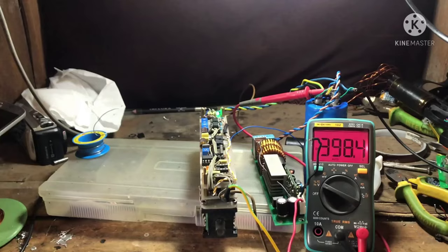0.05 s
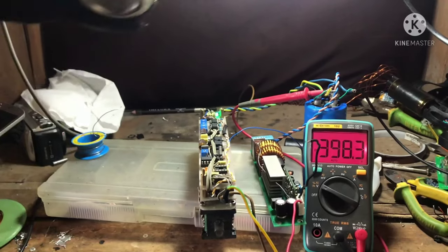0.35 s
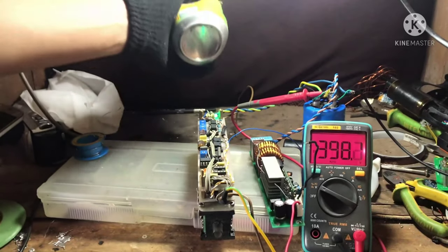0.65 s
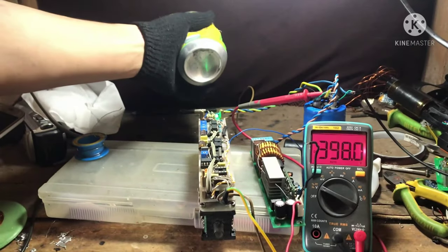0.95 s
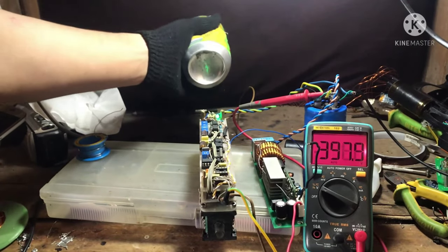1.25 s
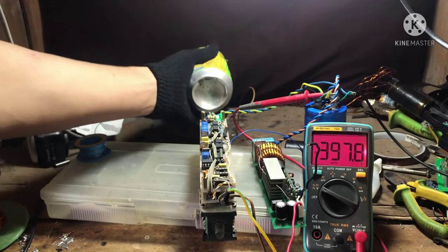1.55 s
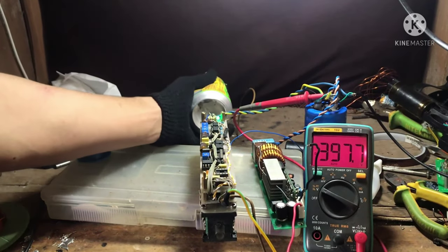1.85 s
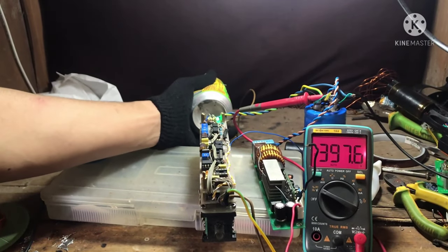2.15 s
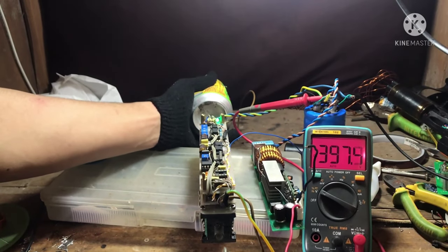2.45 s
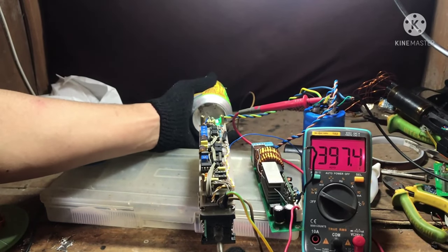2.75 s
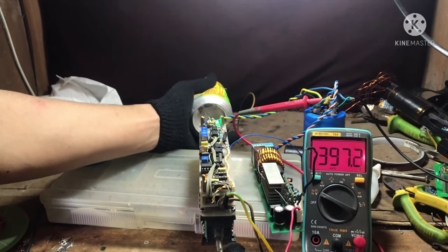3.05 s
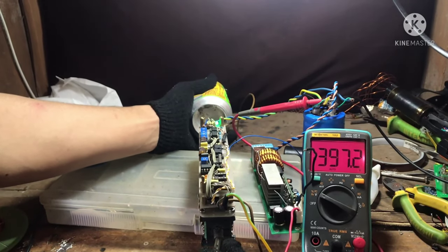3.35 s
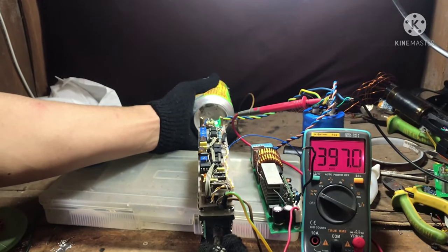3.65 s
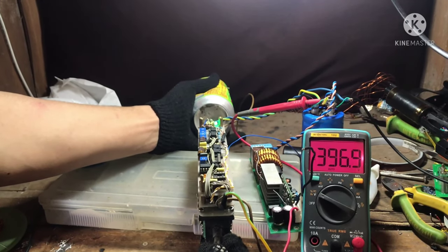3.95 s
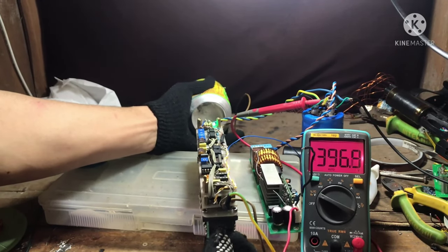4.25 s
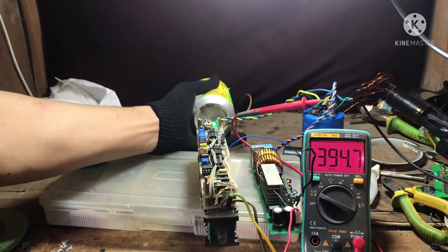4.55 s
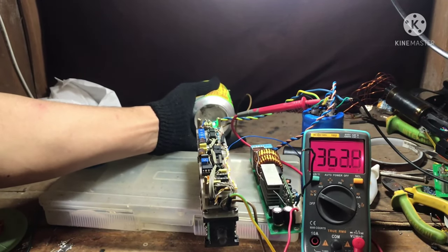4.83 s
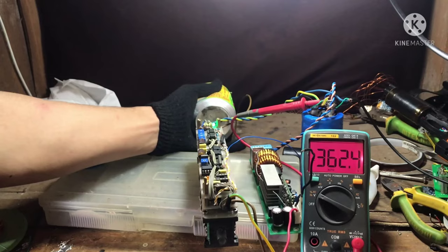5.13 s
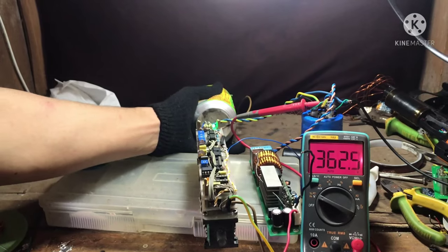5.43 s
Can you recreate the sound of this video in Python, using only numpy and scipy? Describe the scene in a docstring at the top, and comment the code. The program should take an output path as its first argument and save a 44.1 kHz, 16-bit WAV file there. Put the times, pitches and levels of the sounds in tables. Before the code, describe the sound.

A gloved hand softly scrapes and taps a homemade coil gun on a workbench, close to the microphone. For a few seconds there is little but room hum, hiss and a very faint, distant whine. Then comes a sharp snap and, right behind it, the loud metallic crack of the shot, ringing briefly in the small room. Quick knocks and ticks settle, a separate hard click sounds, and the quiet hum returns.

```python
"""A homemade coil gun fires on a cluttered bench in a small, quiet workshop.
Its slug hisses up the barrel and strikes; the impact excites the modes of the metal and the room.
The trigger snaps just before; afterwards the slug knocks about and a last sharp click follows.
Friction and light taps of a gloved hand come before and, fainter, a rustle after.
Underneath lie room hum, microphone hiss and a thin, distant whine."""
import sys
import numpy as np
from scipy import signal
from scipy.fft import rfft, irfft, next_fast_len
from scipy.io import wavfile
from scipy.ndimage import uniform_filter1d

SR = 44100
rng = np.random.default_rng(int(sys.argv[2]) if len(sys.argv) > 2 else 0)


def master(y):
    """Save y as 16-bit WAV."""
    cut = np.clip(np.atleast_2d(y).T, -1, 1)
    pcm = np.round(cut * 32767)  # scale
    wavfile.write(sys.argv[1], SR, pcm.astype(np.int16))


N = 250929
TIME = np.arange(N) / SR


def amp(db):
    """Amplitude ratio of a relative level: 20 dB to a factor of ten."""
    return 10 ** (np.asarray(db) / 20)


def unit_rms(x):
    """Normalisation to unit mean power."""
    return x / np.sqrt(np.mean(x ** 2) + 1e-20)


def curve_at(points, hz):
    """Interpolation on a logarithmic frequency axis."""
    f, value = np.transpose(points)
    return np.interp(np.log(hz + 1), np.log(f + 1), value)


def add(mix, start, sound):
    """Superposition of a sound from a given time on."""
    part = mix[round(start * SR):][:len(sound)]
    part += sound[:len(part)]


def drift(cutoff_hz):
    """Random fluctuation: low-passed noise of unit rms."""
    size = next_fast_len(N, True)
    passband = np.fft.rfftfreq(size, 1 / SR) < cutoff_hz
    return unit_rms(irfft(rfft(rng.standard_normal(size)) * passband, size)[:N])


def envelope(start, attack_s, hold_s, t60_s, jump=0):
    """Exponential decay after a jump, a linear rise to one and a hold."""
    t = TIME - start
    rise = np.minimum(jump + (1 - jump) * t / attack_s, 1)
    decay = amp(-60 * np.maximum(t - attack_s - hold_s, 0) / t60_s)
    return (t >= 0) * rise * decay


def arch(start, length):
    """Half-sine window: a swell from zero to one and back."""
    return np.sin(np.pi * np.clip((TIME - start) / length, 0, 1))


def resonate(x, spectrum, modes=(), size=16384):
    """Minimum-phase filtering at unit energy: resonances standing on a broad spectrum."""
    hz = np.fft.rfftfreq(size, 1 / SR)
    peaks = 1 + sum(amp(db) / (1 + 2j * (hz - f) / width) for f, width, db in modes)
    magnitude = amp(curve_at(spectrum, hz)) * abs(peaks)
    cepstrum = irfft(np.log(magnitude + 1e-9))
    cepstrum[1:size // 2] *= 2  # folding onto positive time makes the response causal
    cepstrum[size // 2 + 1:] = 0
    response = irfft(np.exp(rfft(cepstrum)))
    return signal.oaconvolve(x, response / np.linalg.norm(response))[:N]


def clatter(shape, passes=4):
    """Dense micro-contacts as shaped noise: spectrally flat where loud, Gaussian where faint."""
    core, fringe = shape * rng.standard_normal((2, len(shape)))
    for _ in range(passes):  # flatten the spectrum, then restore the envelope
        core = irfft(np.exp(1j * np.angle(rfft(core))), len(core))
        core *= shape / np.sqrt(abs(uniform_filter1d(core ** 2, size=64)) + 1e-14)
    share = np.minimum(1, 10 * (shape / shape.max()) ** 2)
    return np.sqrt(share) * core + np.sqrt(1 - share) * fringe


def impacts(rows, spectrum, modes, direct):
    """Impact excitation: each contact and its quick scatter off the bench ring the struck body."""
    force, t = np.zeros(N), TIME[:SR // 8]
    for start, db, t60, cutoff_hz in rows:
        contact = clatter(amp(-60 * t / t60))
        contact /= np.linalg.norm(contact)
        contact[0] += direct
        pole = np.exp(-2 * np.pi * cutoff_hz / SR)  # a soft contact lasts longer and loses its treble
        add(force, start, amp(db) * signal.lfilter([1 - pole], [1, -pole], contact))
    return resonate(force, spectrum, modes)


# Spectrum of rumble and hiss: f/Hz, level/dB
FLOOR_SPECTRUM = [(25, -30), (42, 0.5), (75, -1.5), (120, -10.5), (280, -10.5), (420, -17.5), (1000, -22.5),
                  (2000, -31.5), (5000, -36.5), (7700, -34), (8500, -24.5), (9400, -27.5), (10400, -31.5),
                  (15500, -40.5)]
# Narrow lines in it: f/Hz, bandwidth/Hz, level/dB
FLOOR_LINES = [(75, 8, -3.5), (100, 6, -4.5), (166, 10, 7.5), (217, 8.7, 3.5), (264, 7, 3.5),
               (323, 10, 2.5), (619, 18, 3.5), (8370, 25, 10.5), (8790, 40, 11.5), (9030, 25, 9),
               (9410, 25, 13), (9660, 25, 9.5)]


def background(level_db=-56.5, waver_db=.5):
    """Noise floor: room hum and microphone hiss form a continuous spectrum with narrow lines."""
    noise = resonate(rng.standard_normal(N), FLOOR_SPECTRUM, FLOOR_LINES)
    return amp(level_db + waver_db * drift(4)) * unit_rms(noise)


def hum_swell(start_s=2, length_s=1.16, hz=270, level_db=-61.5, waver_db=3.0):
    """Amplitude modulation: one tone of the room's hum swells once, unsteadily."""
    gain = arch(start_s, length_s) * amp(level_db + waver_db * drift(8))
    return gain * np.sin(2 * np.pi * hz * TIME)


# Swells of the whine: t/s, duration/s, f/Hz, level/dB
WHINE_SWELLS = [(2.796, .24, 722, -71), (3.232, 0.11, 716, -70), (3.531, .13, 805, -69),
                (3.797, 0.31, 795, -70.5)]


def whine(sag=.04, jitter=0.0348, partials_db=(1, 0, -12)):
    """Harmonic series of a far, unsteady tone whose pitch and amplitude follow the same arch."""
    gain, pitch = np.zeros(N), np.zeros(N)
    for start, length, hz, db in WHINE_SWELLS:
        swell = arch(start, length)
        gain += amp(db) * swell
        pitch[TIME >= start] = (hz * (1 - sag * (1 - swell)))[TIME >= start]
    phase = 2 * np.pi * np.cumsum(pitch * (1 + jitter * drift(88.8))) / SR
    return gain * sum(amp(db + 2 * drift(23)) * np.sin(k * phase) for k, db in enumerate(partials_db, 1))


# Reverberation time of the workshop: f/Hz, T60/s
REVERB_TIMES = [(100, 0.4), (400, 1.1), (800, 0.91), (3000, 0.87), (6000, 0.9), (12000, 0.62)]
# Spectrum of its echo: f/Hz, level/dB
REVERB_SPECTRUM = [(60, -9), (300, -8.5), (850, -11), (1500, -15.5), (3000, -19), (6000, -18.5),
                   (15000, -20.5)]


def reverberation(x, build_s=0.0069):
    """Diffuse field: it builds up quickly, then each band decays exponentially at its own rate."""
    hz, t, noise = signal.stft(rng.standard_normal(SR), SR, nperseg=256)
    t60 = curve_at(REVERB_TIMES, hz)[:, None]
    decay = amp(-60 * t / t60) * np.sqrt(2 * np.log(1000) / (t60 * SR))  # unit energy in each band
    bands = noise * decay * amp(curve_at(REVERB_SPECTRUM, hz))[:, None]
    tail = signal.istft(bands, SR, nperseg=256)[1][:SR]
    onset = 1 - np.exp(-(TIME[:SR] / build_s) ** 2)
    return signal.oaconvolve(x, tail * onset)[:N]


# Strokes of glove and sleeve: t/s, duration/s, level/dB
CLOTH_STROKES = [(0.095, 0.39, -68.5), (0.224, 0.069, -69.5), (5.42, .26, -79)]
# Their spectrum: f/Hz, level/dB
CLOTH_SPECTRUM = [(500, -5), (2500, -1), (7000, -3), (11000, -2.5), (13500, 2), (15500, -3.5)]
# Scrapes of the gun being moved into place: t/s, slide/s, level/dB, resonance/Hz
GUN_SCRAPES = [(0.496, 0.045, -53, 1030), (.56, 0.043, -54.5, 620), (.815, 0.036, -68.5, 1040),
               (1.24, 0.029, -63, 1200)]
# Their spectrum: f/Hz, level/dB
SCRAPE_SPECTRUM = [(200, -17), (430, -4.5), (550, 1), (800, -2.5), (1100, -4), (1600, -13), (2300, -27.5),
                   (5000, -44)]
# Thin zips of the sliding knit: t/s, duration/s, initial f/Hz, level/dB
KNIT_ZIPS = [(.32, .09, 14200, -72), (.39, .08, 14800, -68), (5.5, .07, 13200, -73),
             (5.58, .08, 12400, -72)]


def handling(grip_db=1.0, scrape_width_hz=220, scrape_peak_db=6.5, slowing_per_s=1.4, zip_band_hz=250):
    """Sliding friction: cloth rustles, the gun scrapes and the knit zips, all catching unevenly."""
    strokes = sum(amp(db) * arch(start, length) for start, length, db in CLOTH_STROKES)
    out = strokes * resonate(rng.standard_normal(N), CLOTH_SPECTRUM)
    for start, slide, db, hz in GUN_SCRAPES:
        mode = (hz, scrape_width_hz, scrape_peak_db)
        friction = resonate(rng.standard_normal(N), SCRAPE_SPECTRUM, [mode])
        out += amp(db) * envelope(start, attack_s=0.0071, hold_s=slide, t60_s=0.43) * friction
    for start, length, hz, db in KNIT_ZIPS:
        pitch = hz * (1 - slowing_per_s * np.clip(TIME - start, 0, length))  # falls as the stroke slows
        narrow_noise = drift(zip_band_hz) * np.sin(2 * np.pi * np.cumsum(pitch) / SR)
        out += amp(db) * arch(start, length) * narrow_noise
    return out * amp(grip_db * drift(69))


# Fingers on the gun, and at 0.4995 s the knock that starts the first scrape: t/s, level/dB, contact cutoff/Hz
FINGER_TAPS = [(.4995, -33, 500), (.749, -27.5, 9000), (1.375, -40.5, 6000), (2.31, -45, 3000),
               (4.044, -32.5, 12000)]
# Their spectrum: f/Hz, level/dB
TAP_SPECTRUM = [(200, -13), (700, -5), (1250, 6), (1800, -11.5), (2500, -7), (3100, -4.5), (4200, -14.5),
                (6000, -25.5), (15000, -28.5)]
# Modes they excite: f/Hz, bandwidth/Hz, level/dB
TAP_RESONANCES = [(2912, 40, 3), (3200, 35, 6)]


def finger_taps(t60_s=.08):
    """Light impacts: shifting fingers, and the knock that opens the first scrape, weakly excite the gun's
    modes."""
    rows = [(start, db, t60_s, hz) for start, db, hz in FINGER_TAPS]
    return impacts(rows, TAP_SPECTRUM, TAP_RESONANCES, direct=.05)


# Recoil and soft bumps: t/s, level/dB, f/Hz, duration/s
BENCH_BUMPS = [(1.9155, -35, 137, 0.014), (4.2815, -24.5, 274, 0.0042), (4.283, -29.5, 75, .014),
               (4.384, -36.5, 127, 0.019), (5.074, -44.5, 149.6, 0.03), (5.606, -43.5, 140, 0.02)]


def bench_bumps():
    """Gaussian wave packets: recoil and padded contacts push the bench briefly at low frequency."""
    out = np.zeros(N)
    for centre, db, hz, length in BENCH_BUMPS:
        t = TIME - centre
        out += amp(db) * np.cos(2 * np.pi * hz * t) * np.exp(-2 * np.pi * (t / length) ** 2)
    return out


# Spectrum of loose bits ticking on the bench: f/Hz, level/dB
TICK_SPECTRUM = [(300, -12), (800, -2), (2200, -6), (3800, 1), (7000, -7), (15000, -3)]


def settling(start_s=4.31, length_s=.25, ticks_per_s=50, level_db=-20, fall_db_per_s=61, spread_db=2.5):
    """Poisson process: loose bits tick at random, ever more weakly, as they settle after the shot."""
    t = TIME - start_s
    ticks = (rng.random(N) < ticks_per_s / SR) * (t > 0) * (t < length_s)
    strength = amp(level_db - fall_db_per_s * np.maximum(t, 0) + spread_db * rng.uniform(-1, 1, N))
    return resonate(ticks * strength, TICK_SPECTRUM)


# Clicks of switch and housing: t/s, level/dB, scatter T60/s
HOUSING_CLICKS = [(4.045, -35.5, 0.037), (4.2547, -12, .006), (4.536, -27.5, 0.041), (5.1008, -4, 0.031),
                  (5.2003, -43, .012), (5.235, -41, .032)]
# Their spectrum: f/Hz, level/dB
CLICK_SPECTRUM = [(100, -15), (470, -17), (650, -0.5), (1500, -2.5), (2200, -9.5), (3000, 2), (3700, 5),
                  (4500, 2), (6500, -7), (8500, -1), (11000, -11), (15000, -15.5)]
# Modes they excite: f/Hz, bandwidth/Hz, level/dB
CLICK_RESONANCES = [(1560, 40, 1), (3460, 60, -1.5), (3870, 28, 6), (7600, 45, 4), (9440, 50, 4.5)]


def housing_clicks(cutoff_hz=16000):
    """Hard impacts: a short contact has a wide spectrum and reaches the high modes."""
    rows = [(start, db, t60, cutoff_hz) for start, db, t60 in HOUSING_CLICKS]
    return impacts(rows, CLICK_SPECTRUM, CLICK_RESONANCES, direct=.15)


# Knocks of the slug and things it unsettles: t/s, level/dB, contact cutoff/Hz
SLUG_KNOCKS = [(4.3245, -2.5, 1000), (4.361, -8.5, 5000), (4.4133, 0.5, 16000), (4.4772, -8.5, 900),
               (4.4932, -11.5, 1400), (4.4985, -13.5, 800), (4.5195, -12.5, 699.7), (5.336, -23, 800)]
# Their spectrum: f/Hz, level/dB
KNOCK_SPECTRUM = [(100, -14), (470, -17), (620, 2.5), (900, -6), (1250, -0.5), (1600, -3.5), (1900, -6.5),
                  (3300, -9.5), (5500, -14.5), (10000, -13.5), (15000, -23)]
# Modes they excite: f/Hz, bandwidth/Hz, level/dB
KNOCK_RESONANCES = [(630, 39, 5.5), (800, 30, 2.5), (1560, 80, 3.5), (3220, 120, -0.5), (4230, 86, 8.5)]


def slug_knocks(t60_s=.03):
    """Contact time sets brightness: the slug knocks about, duller where the contact is softer."""
    rows = [(start, db, t60_s, hz) for start, db, hz in SLUG_KNOCKS]
    return impacts(rows, KNOCK_SPECTRUM, KNOCK_RESONANCES, direct=.05)


# Contacts of the trigger: t/s, level/dB, scatter T60/s, contact cutoff/Hz
TRIGGER_CONTACTS = [(4.2013, -0.5, .018, 16000), (4.2029, 3.5, .02, 8000), (4.2056, -1, .035, 2490)]
# Their spectrum: f/Hz, level/dB
TRIGGER_SPECTRUM = [(100, -28), (450, -24), (600, -9), (1000, -10.5), (1500, -0.5), (2000, -3), (3000, 0.5),
                    (3800, -11), (4600, -3.5), (8000, -10), (15000, -11.5)]
# Modes they excite: f/Hz, bandwidth/Hz, level/dB
TRIGGER_RESONANCES = [(877.6, 60, 3), (1280, 110, 1), (1700, 120, 6), (2600, 130, 5), (6570, 120, 5),
                      (8880, 200, 7), (9570, 150, 5)]


def trigger_snap():
    """Temporal fusion: three contacts within 5 ms are heard as one snap."""
    return impacts(TRIGGER_CONTACTS, TRIGGER_SPECTRUM, TRIGGER_RESONANCES, direct=.25)


# Spectrum of the slug's hiss in the barrel: f/Hz, level/dB
BARREL_SPECTRUM = [(200, -8), (900, -5), (2200, -8), (3300, -1), (6000, -0.5), (9000, -3.5), (15000, -9)]


def barrel_rush(strike_s, length_s=0.022, near_s=.0055, level_db=-23):
    """Inverse-square growth: the slug's hiss rises as the time left to the strike runs out."""
    left = strike_s - TIME
    growth = (left > 0) * (left < length_s) / (1 + abs(left) / near_s) ** 2
    return resonate(amp(level_db) * growth * rng.standard_normal(N), BARREL_SPECTRUM)


# Hardest blows within the shot: t/s, level/dB
SLUG_BLOWS = [(4.2781, 6), (4.2896, 2), (4.2932, 5), (4.2992, -3)]
# Spectrum of the shot: f/Hz, level/dB
SHOT_SPECTRUM = [(30, -13.5), (70, -6), (120, -14.5), (260, -8), (470, -6.5), (650, -1), (1050, -2),
                 (1300, -7.5), (2200, -3.5), (3050, 1), (4000, -7), (6500, -7), (9000, -7.5), (15000, -10)]
# Modes of the ringing metal: f/Hz, bandwidth/Hz, level/dB
METAL_MODES = [(264, 12, 7), (354.4, 14, 6.5), (610, 22, 1), (766, 8, 5), (820, 20, 8), (881, 14, 3),
               (910, 7, 9), (1125, 16, 6), (1498, 33, 9), (1900, 50, 5), (2750, 120, -2), (3070, 55, 7),
               (3285, 55, 8.5), (3615, 45, 8), (4758, 30, 11.5), (5535, 25, 3), (6280, 60, 2),
               (6690, 40, 8), (9490, 20, 4)]


def shot(strike_s, crack_db=-12, rattle_db=-24.5):
    """Modal excitation by the slug's blows and rattle. Returns the metal's ring and the broad blast."""
    crack = amp(crack_db) * envelope(strike_s, attack_s=0.0076, hold_s=.008, t60_s=.028, jump=.4)
    rattle = amp(rattle_db) * envelope(strike_s, attack_s=1 / SR, hold_s=0, t60_s=.2)
    shape = (crack + rattle)[TIME >= strike_s][:SR // 4]
    force = np.zeros(N)
    add(force, strike_s, clatter(shape))
    for start, db in SLUG_BLOWS:
        add(force, start, amp([db]))
    return resonate(force, SHOT_SPECTRUM, METAL_MODES), resonate(force, SHOT_SPECTRUM)


def scene(strike_s=4.278):
    """Superposition of direct and reverberant sound; the blast is heard only through the room."""
    ring, blast = shot(strike_s)
    trigger, knocks, clicks, taps = trigger_snap(), slug_knocks(), housing_clicks(), finger_taps()
    into_room = amp(-4.5) * (blast + clicks + taps) + amp(-8.5) * ring
    into_room += amp(-5.5) * trigger + amp(-9.0) * knocks
    echo = reverberation(into_room)
    gun = barrel_rush(strike_s) + ring + trigger + clicks
    bench = settling() + knocks + bench_bumps()
    hands = handling() + taps
    ambience = whine() + background() + hum_swell()
    return (gun + bench + hands + echo + ambience)[None]


def record(dry, ceiling=0.96, gain_db=-1.5, fade_start_s=0.083, fade_s=.19, cutoff_hz=15700):
    """Soft saturation and band limiting: the microphone fades up, rounds peaks and cuts the top."""
    fade = amp(gain_db) * np.clip((TIME - fade_start_s) / fade_s, 0, 1)
    rounded = ceiling * np.tanh(dry * fade / ceiling)
    lowpass = signal.firwin(511, cutoff_hz, window=("kaiser", 9), fs=SR)
    return signal.oaconvolve(rounded, lowpass[None], "same")


dry = scene()
out = record(dry)
master(out)
```